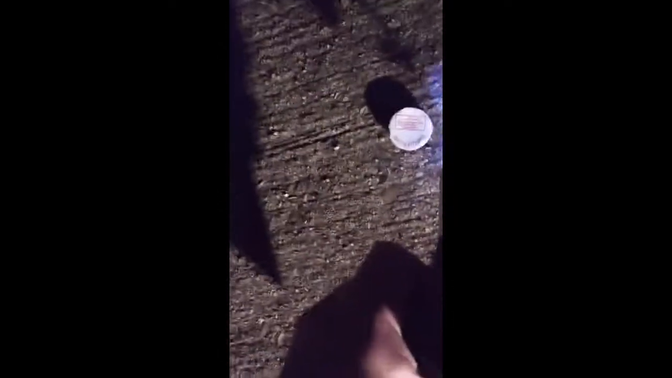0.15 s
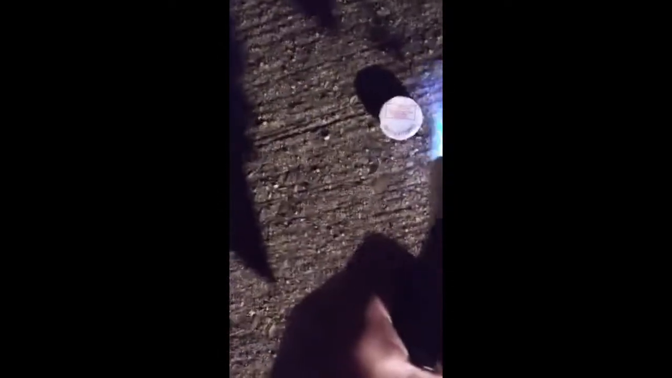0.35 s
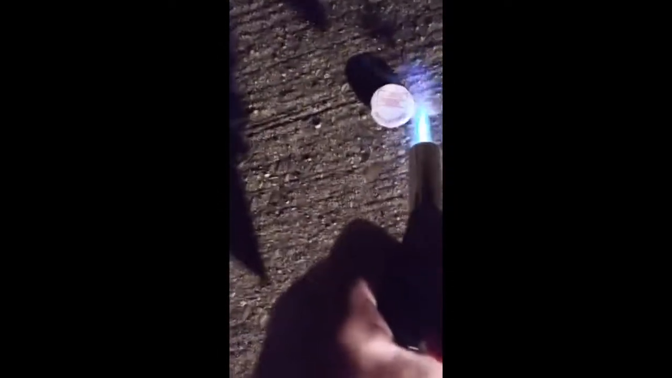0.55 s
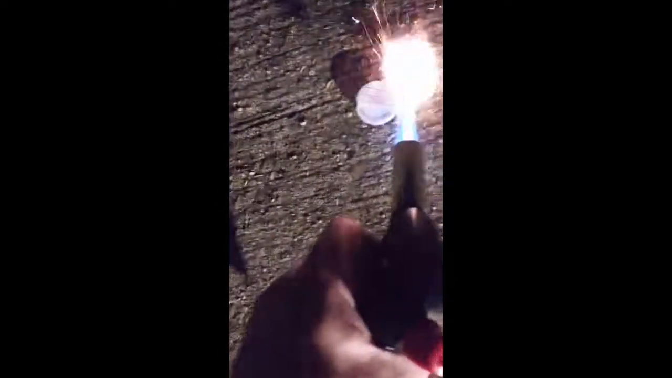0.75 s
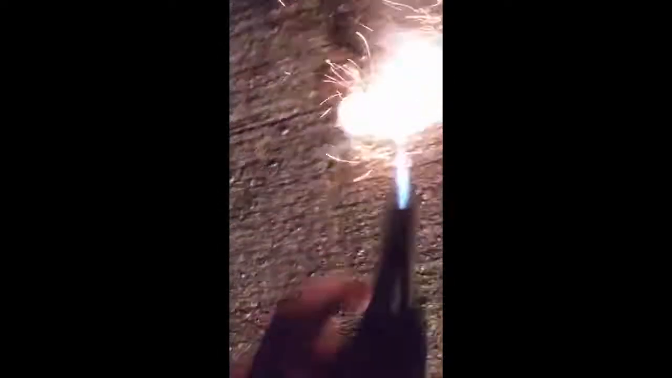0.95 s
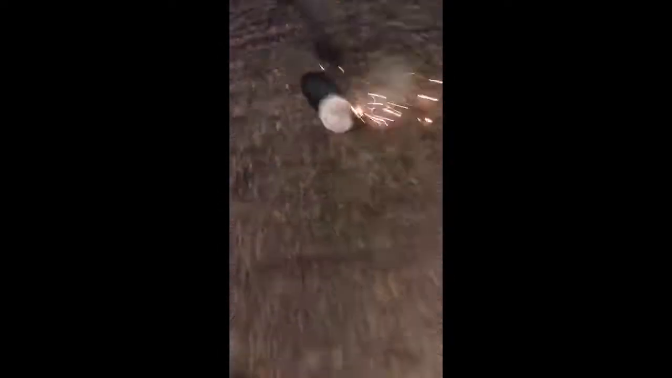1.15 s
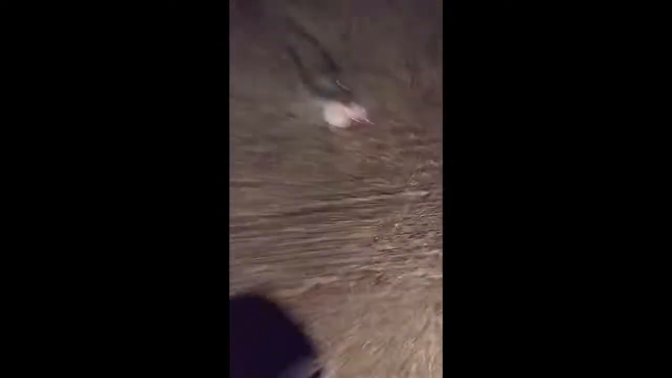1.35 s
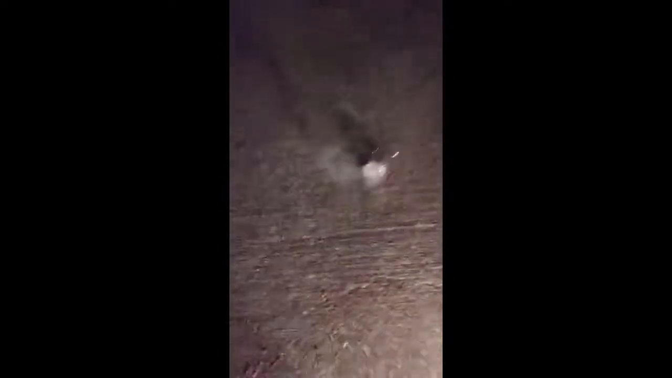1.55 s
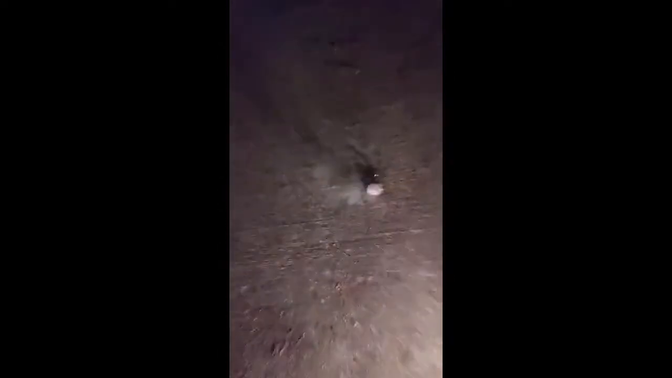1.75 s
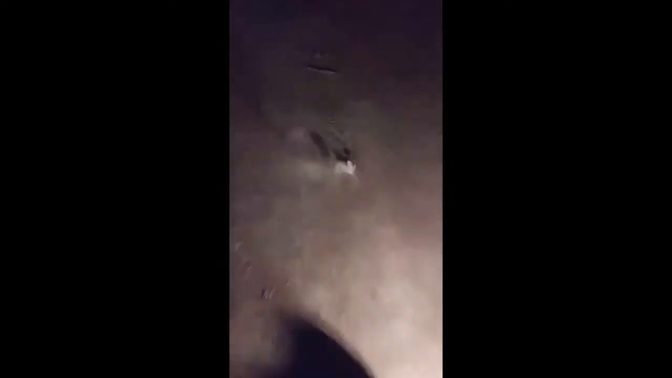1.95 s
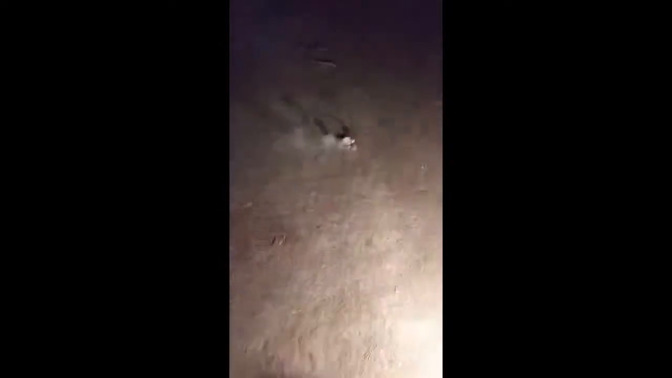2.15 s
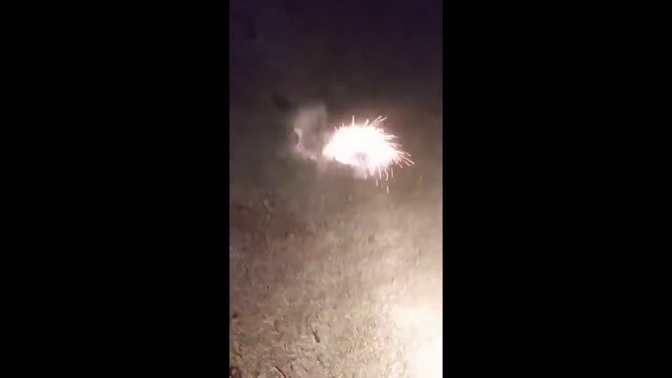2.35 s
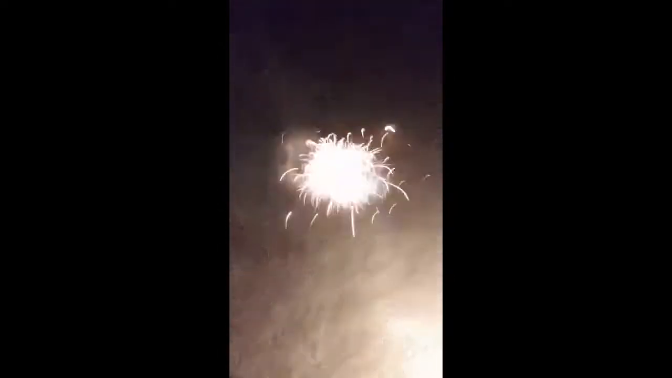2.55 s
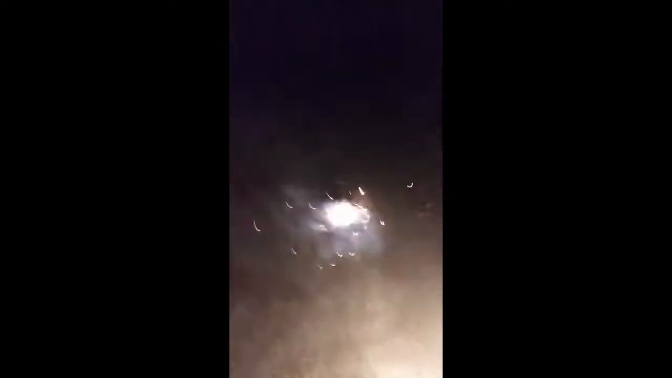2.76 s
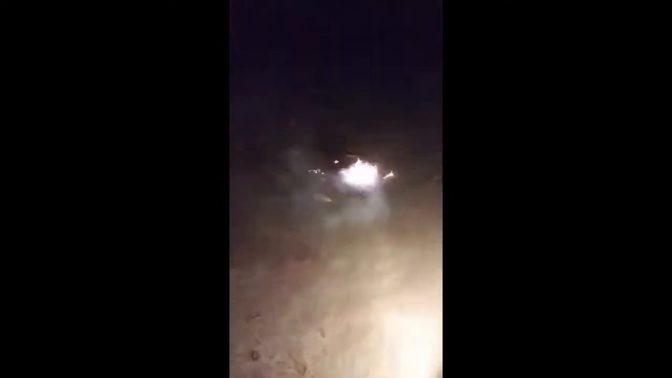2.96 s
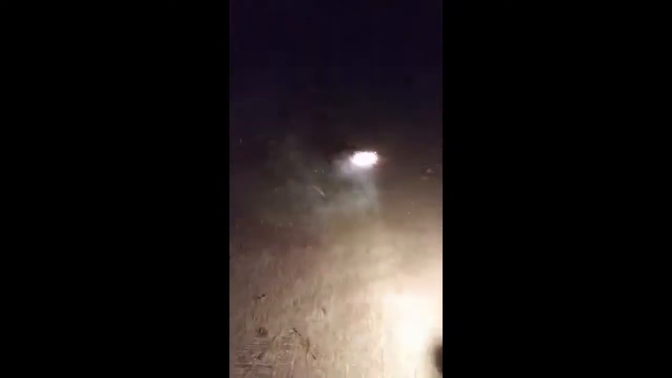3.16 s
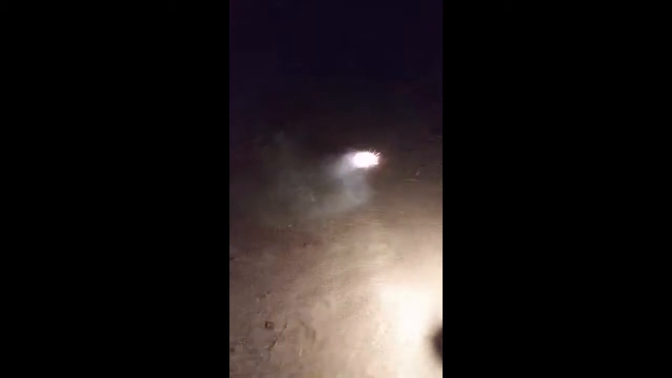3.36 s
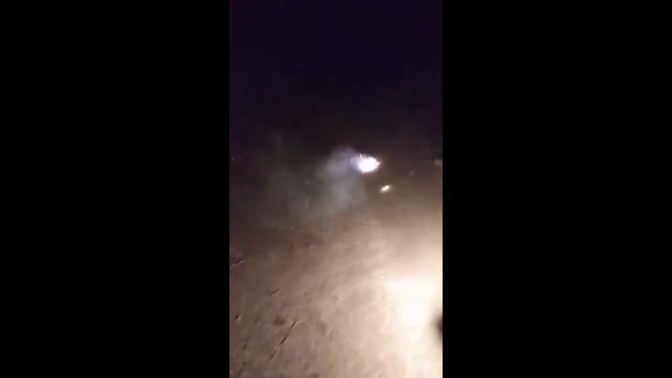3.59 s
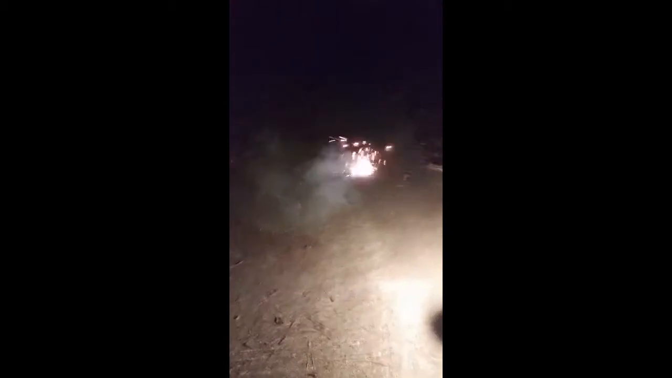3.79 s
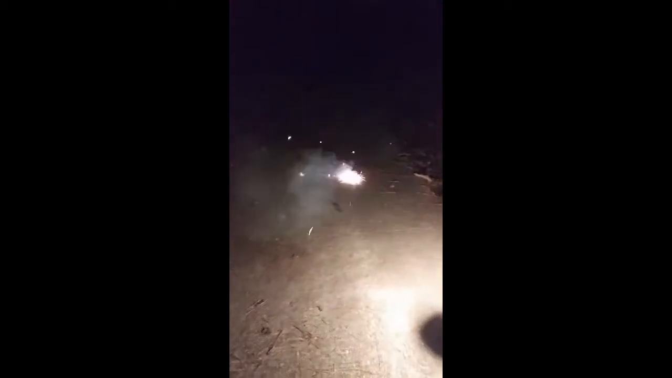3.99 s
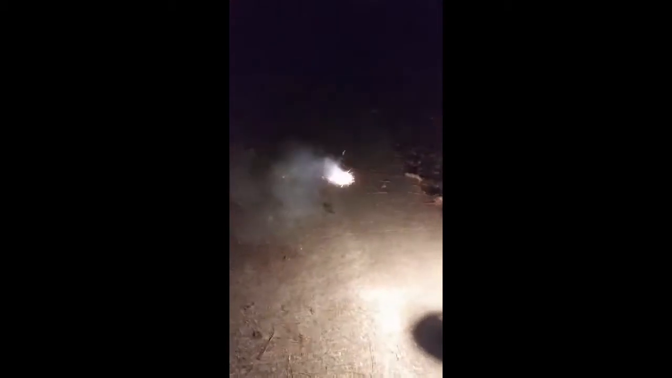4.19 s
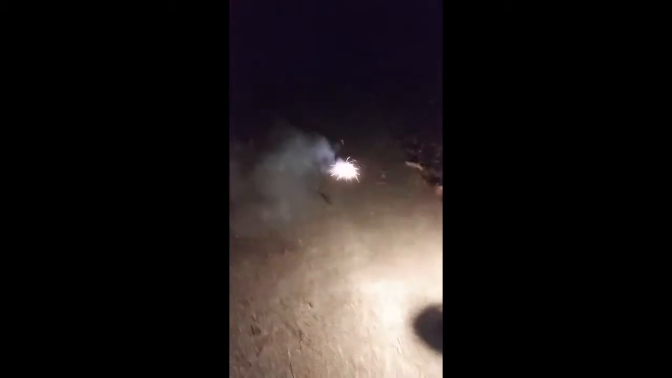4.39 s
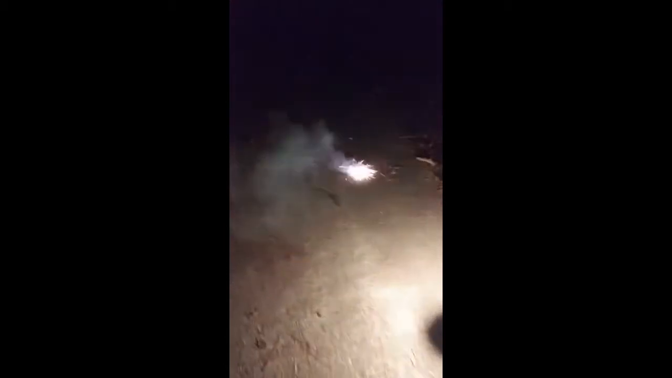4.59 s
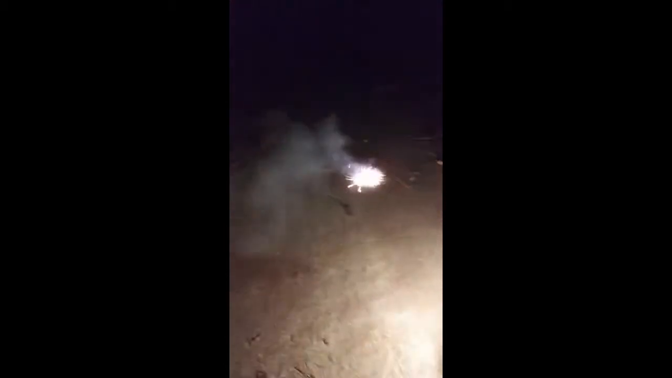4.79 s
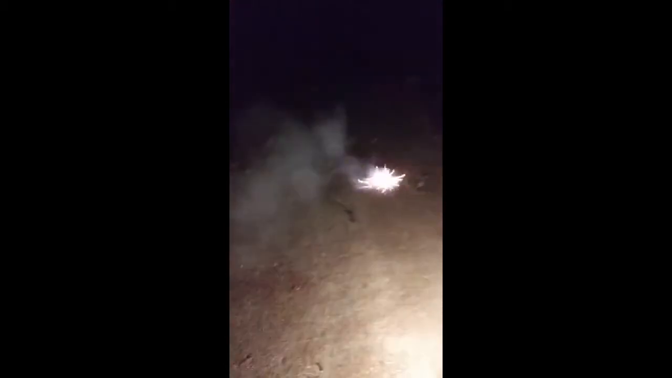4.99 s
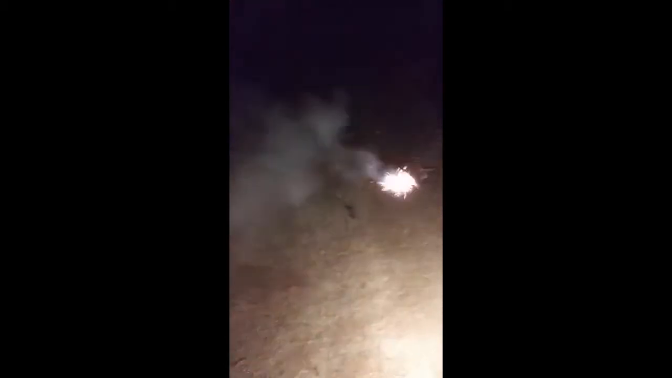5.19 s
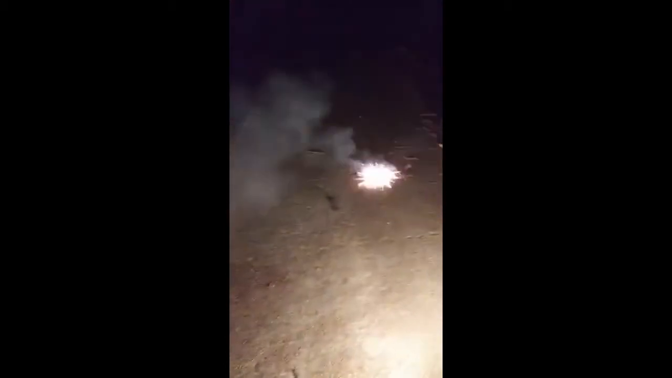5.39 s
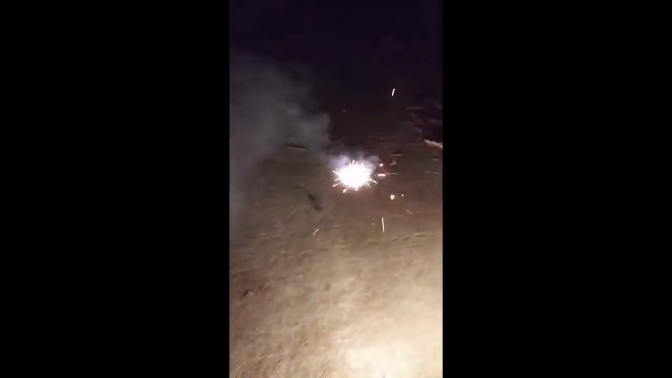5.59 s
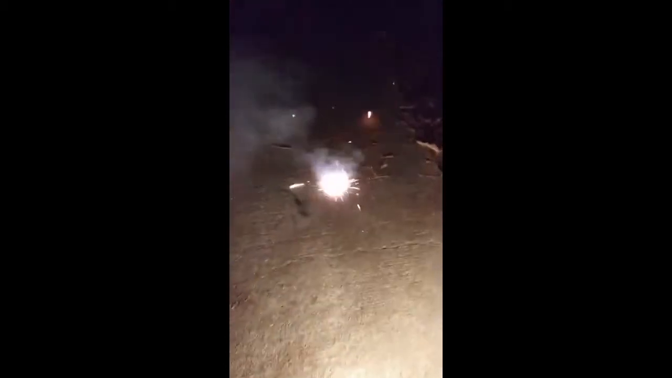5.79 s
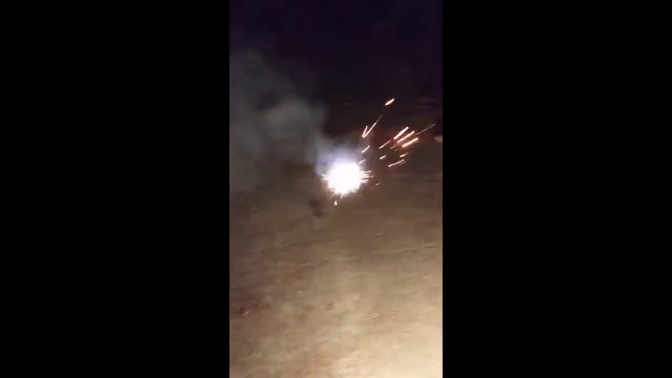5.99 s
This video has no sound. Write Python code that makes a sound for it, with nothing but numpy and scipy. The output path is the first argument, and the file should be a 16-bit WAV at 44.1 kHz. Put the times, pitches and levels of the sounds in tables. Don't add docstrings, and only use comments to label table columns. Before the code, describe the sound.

A fluttering torch flame with a smooth nozzle hiss ends in a hard trigger click. Hurried soles scrape grit, kicking small ticking pebbles, as sparks pop sharply. The fuse gives way to a harsh crackling whoosh that surges twice, then thins to a sputtering jet with dull tube roar, swelling now and then. Open concrete yard, very little echo, handheld microphone moving closer, its hiss tone shifting.

```python
import sys
import numpy as np
from scipy import signal
from scipy.fft import rfft, irfft
from scipy.io import wavfile
from scipy.ndimage import uniform_filter1d, map_coordinates

SR = 44100
rng = np.random.default_rng(int(sys.argv[2]) if len(sys.argv) > 2 else 0)


def boost_factor(decibels):
    exponent = np.asarray(decibels, float) / 20
    return 10 ** exponent


def master_out(mix):
    frames = np.transpose(np.atleast_2d(mix))
    ceiling = np.clip(frames, -1, 1)
    pcm = np.round(ceiling * 32767).astype(np.int16)
    wavfile.write(sys.argv[1], SR, pcm)


N = 266364
IGNITE_S, SPENT_S = 2.33, 0.506


def evened(x):
    return x / np.sqrt(np.mean(x ** 2) + 1e-20)


def read(points, hz):
    f, value = np.transpose(points)
    return np.interp(np.log(hz + 1), np.log(f + 1), value)


def follow(rows):
    s, *columns = np.transpose(rows)
    return [np.interp(np.arange(N) / SR, s, c) for c in columns]


def held(start, length, edge_s):
    t = np.arange(N) / SR
    corners = [start - edge_s, start, start + length, start + length + edge_s]
    return np.interp(t, corners, [0, 1, 1, 0]) ** 2


def add(mix, s, sound):
    part = mix[round(s * SR):][:len(sound)]
    part += sound[:len(part)]


def wander(lo_hz, hi_hz):
    t = np.arange(0, N, 32) / SR
    rates = np.geomspace(lo_hz, hi_hz, num=40)
    slow = sum(np.sin(2 * np.pi * (f * t + rng.random())) / np.sqrt(f) for f in rates)
    return np.interp(np.arange(N) / SR, t, evened(slow))


def coloured(x, points, peaks=()):
    hz = np.fft.rfftfreq(N, 1 / SR)
    db = read(points, hz) + sum(d * np.exp(-((hz - f) / w) ** 2 * 2) for f, w, d in peaks)
    return evened(irfft(rfft(x) * boost_factor(db), N))


def patchy(patch_db):
    a, b, patches = rng.standard_normal((N // 128 + 5, 257, 3)).T
    patches = uniform_filter1d(patches, size=7, axis=0)
    patches = evened(uniform_filter1d(patches, size=20, axis=1))
    spectra = (a + 1j * b) * boost_factor(patch_db * patches)
    return signal.istft(spectra, nperseg=512, noverlap=384)[1][:N]


def bursts(per_s, spread_db):
    strength = boost_factor(spread_db * np.minimum(rng.exponential(1, N), 4))
    return strength * (rng.random(N) < per_s / SR) * rng.choice([-1, 1], N)


def ring(hz, t60_ms, snap):
    t = np.arange(1500) / SR
    crack = signal.lfilter(*signal.butter(2, min(2.5 * hz, 12000), fs=SR), rng.standard_normal(len(t)))
    tone = boost_factor(-60000 * t / t60_ms) * np.sin(2 * np.pi * hz * t)
    sound = tone + snap * boost_factor(-60 * t / 0.0012) * evened(crack)
    return sound / abs(sound).max()


def echoed(x, path_ms, strength, dull_hz):
    dull = signal.filtfilt(*signal.butter(1, dull_hz, fs=SR), x)
    late = map_coordinates(dull, [np.arange(N) - path_ms * SR / 1000])
    return (x + strength * late) / np.sqrt(1 + strength ** 2)


# frequency in Hz, level in dB per Hz.
NIGHT = [(20, -50), (40, -89), (73, -12.5), (187, -3), (310, -2.5), (900, -0.5), (1500, -15), (2200, -22),
         (5700, -22), (7600, -14), (10000, -36), (12500, -38), (15600, -45)]


def night():
    level_db = -43.5 - 1.5 + 0.6 * wander(0.45, 13)
    return boost_factor(level_db) * coloured(patchy(0.4), NIGHT)


def yard(x):
    t = np.arange(9000) / SR
    tail = rng.standard_normal(len(t)) * boost_factor(-60 * t / 0.084) * (t > .004)
    return signal.fftconvolve(x, tail / np.linalg.norm(tail))[:N]


# start in seconds, length in seconds, level in dB.
SIGH = (1.06, .05, -46.5)
# frequency in Hz, level in dB per Hz.
PIPE = [(1200, -29), (2000, -1), (2600, 3), (3200, -10), (4200, -18), (5200, -10), (6500, -31)]


def sigh():
    start, length, db = SIGH
    return boost_factor(db) * held(start, length, 0.023) * coloured(rng.standard_normal(N), PIPE)


# frequency in Hz, level in dB per Hz.
TORCH = [(24, -76), (40, -66), (170, -4.5), (881, -1.5), (1080, -8.5), (1730, -18.5), (3470, -22.5),
         (3930, -34), (5170, -15), (7340, -23.5), (8730, -22.5), (10100, -37.5), (15500, -55)]
# frequency in Hz, width in Hz, gain in dB.
NOZZLE = [(2660, 370, 4), (3440, 380, 1.5), (3900, 600, 2.5), (4600, 180, -7), (5300, 1000, 4.5),
          (6400, 340, -7), (6640, 200, 11.5), (7980, 270, 8.5), (8700, 530, 6)]


def torch():
    t = np.arange(N) / SR
    shut = np.maximum(t - 1.04, 0)
    opening_db = -0.5 * np.maximum(1 - t / 0.39, 0)
    closing_db = -4.5 * np.minimum(shut / .02, 1) - 136 * shut
    gas = coloured(patchy(1.0), TORCH, NOZZLE)
    roar = signal.sosfiltfilt(signal.butter(2, 1700, fs=SR, output="sos"), gas)
    nozzle_hiss = (gas - roar) * boost_factor(0.5)
    flame = roar * boost_factor(0.72 * wander(15, 130)) + nozzle_hiss
    return flame * boost_factor(-33 + opening_db + closing_db)


# start in seconds, length in seconds, level in dB.
SCUFF = [
    (1.098, 0.035, -52),
    (1.218, 0.19, -48),
    (1.402, .09, -54.5),
    (1.504, 0.015, -38),
    (1.532, 0.044, -49),
    (1.584, 0.029, -41.5),
]
# frequency in Hz, level in dB per Hz.
GRIT = [(300, -39), (900, -3), (2000, 3), (3200, -2.5), (4500, 5), (6000, -7), (7600, 6.5), (10000, -18),
        (15600, -26)]


def scuffs():
    stones = bursts(700, 2.1)
    drag = sum(boost_factor(db) * held(s, length, .015) for s, length, db in SCUFF)
    return drag * coloured(stones, GRIT)


# start in seconds, peak in dB, ring in Hz, t60 in ms.
KNOCKS = [(1.252, -46, 703, 14), (1.285, -22.5, 1470, 12), (1.518, -37, 1260, 21), (1.582, -26.5, 790, 26),
          (1.594, -23, 900, 26), (1.607, -24, 960, 31), (1.938, -48, 915, 14), (2.075, -32, 860, 12),
          (2.315, -52, 937, 14), (3.842, -29, 810, 16), (3.859, -18, 1690, 9.6), (3.867, -23, 1620, 14)]


def knocks():
    out = np.zeros(N)
    for s, db, hz, t60_ms in KNOCKS:
        add(out, s, boost_factor(db) * ring(hz, t60_ms, 0.3))
    return out


# start in seconds, peak in dB, ring in Hz.
PEBBLES = [(1.2527, -20.5, 1550), (1.2517, -23, 4000), (1.281, -25, 1480), (1.519, -24.5, 2130),
           (1.527, -29, 4130), (1.5511, -26, 1670), (1.6009, -18, 1550), (1.6053, -19, 1560),
           (1.9383, -28, 1620), (2.1188, -30.5, 1710), (2.316, -24.5, 2220), (3.3364, -31, 1950),
           (3.8435, -23, 3900), (3.8586, -22, 4200), (3.868, -22, 4000), (4.445, -22, 2660)]


def pebbles():
    out = np.zeros(N)
    for s, db, hz in PEBBLES:
        add(out, s, boost_factor(db) * ring(hz, t60_ms=2.3, snap=0.83))
    return out


# start in seconds, peak in dB, centre in Hz, rattle in ms, t60 in ms.
TRIGGER = [
    (1.0119, -15.5, 8800, 1.5, 6.5),
    (1.017, -2, 5300, 1.1, 11),
    (1.049, -9, 4600, 3.2, 14),
]


def trigger():
    out, t_ms = np.zeros(N), np.arange(1500) * 1000 / SR
    for s, db, hz, rattle_ms, t60_ms in TRIGGER:
        decay = boost_factor(-60 * np.maximum(t_ms - rattle_ms, 0) / t60_ms)
        rattle = rng.standard_normal(len(t_ms)) * decay
        band = signal.butter(2, [hz * 0.63, min(hz * 1.51, 15000)], "band", fs=SR)
        snap = signal.lfilter(*band, rattle) + 0.47 * rattle
        add(out, s, boost_factor(db) * snap / abs(snap).max())
    return out


# start in seconds, peak in dB.
SPARKS = [(1.1643, -35), (1.1945, -26), (1.3124, -21), (1.3374, -25), (1.3798, -37), (1.4207, -23),
          (1.4775, -31), (1.504, -28), (1.5344, -27), (1.547, -36), (1.5874, -35), (1.5953, -25),
          (1.6367, -29), (1.9773, -24), (2.0326, -20), (2.099, -34), (2.162, -34), (2.1684, -30),
          (2.9564, -34), (4.2512, -30)]


def sparks():
    out = np.zeros(N)
    for s, db in SPARKS:
        add(out, s, boost_factor(db) * ring(7760, t60_ms=3.9, snap=0.8))
    return out


def small_hits():
    hits = trigger() + sparks() + pebbles() + knocks()
    return signal.lfilter(*signal.butter(3, [250, 9000], "band", fs=SR), hits)


WHISTLE = 2.96, .15, 1085, 1205, -41


def whistle():
    start, length, from_hz, to_hz, db = WHISTLE
    hz = np.interp(np.arange(N) / SR, [start, start + length], [from_hz, to_hz])
    r = np.exp(-np.pi * 50 / SR)
    slow = signal.lfilter([1 - r], [1, -r], rng.standard_normal(N) + 1j * rng.standard_normal(N))
    steadied = slow / np.sqrt(abs(slow))
    tone = evened((steadied * np.exp(2j * np.pi * np.cumsum(hz) / SR)).real)
    return boost_factor(db) * held(start, length, 0.009) * tone


# time in seconds, level in dB.
FUSE = [(1.07, -55), (1.476, -51.5), (1.65, -56.5), (1.984, -57), (2.32, -59)]
# time in seconds, level in dB.
FLARES = [
    [(2.33, -48), (2.356, -27.5), (2.434, -16), (2.486, -24), (2.518, -17.5), (2.572, -22.5)],
    [(2.6, -15), (2.67, -12), (2.72, -17), (2.77, -15.5), (2.82, -26), (2.846, -29), (2.94, -34.5),
     (3.0, -44)],
]
# time in seconds, level in dB.
JET = [(3.11, -49.5), (3.28, -51.5), (3.44, -48), (3.576, -36.5), (3.72, -49.5), (3.81, -53.5),
       (3.9, -48.5), (4.16, -38.5), (4.36, -44.5), (4.6, -44.5), (4.9, -40.5), (5.08, -50.5), (5.17, -43.5),
       (5.36, -43.5), (5.42, -46), (5.82, -36.5), (5.97, -41), (6.04, -34.5)]


def burn_level():
    return follow(FUSE + sum(FLARES, []) + JET)[0]


# frequency in Hz, level in dB per Hz.
HISS = [(60, -60), (100, -40), (260, -21), (1000, -12), (2400, -13), (3300, -10), (4600, -7.5), (7300, -2),
        (9400, -8.5), (11500, -31.5), (15600, -49)]
# frequency in Hz, width in Hz, gain in dB.
BODY = [(5960, 500, -5), (7950, 420, 3), (1090, 140, -22)]


def gas_hiss(noise):
    return coloured(noise, HISS, BODY)


def jet(gas, since):
    hiss = gas_hiss(gas)
    low = signal.filtfilt(*signal.butter(2, 5150, fs=SR), hiss)
    thin_s = 0.41
    cooling = held(IGNITE_S + SPENT_S + 0.026, thin_s, .04)
    settled = np.clip((since - SPENT_S - thin_s) / .15, 0, 1)
    return hiss + (0.57 * settled - 0.67 * cooling) * low


# frequency in Hz, level in dB per Hz.
FIZZ = [(6500, -54), (9000, 0), (10500, 8.5), (12000, -2), (13200, -7), (14500, -7), (15700, -11)]


def top_fizz(gas, hiss_db, since):
    cool_s, cold_db = 0.32, -64
    glow_s = [-.22, 0, SPENT_S, SPENT_S + cool_s]
    glow_db = np.interp(since, glow_s, [-75, -55, -46, cold_db])
    stirred_db = 0.12 * (since > SPENT_S + cool_s) * (hiss_db + 43)
    ember = boost_factor(glow_db + stirred_db - hiss_db)
    flare = boost_factor(-11.5 - 21.5 * np.clip(since, 0, SPENT_S))
    return np.hypot(flare, ember) * coloured(gas, FIZZ)


# start in seconds, length in seconds, level in dB.
SPITS = [(1.502, 0.015, -39), (1.59, 0.022, -58), (1.98, 0.02, -43), (2.019, 0.01, -48),
         (2.175, 0.019, -41.5), (3.293, 0.056, -40.5), (3.461, 0.024, -39), (3.82, 0.067, -42),
         (3.924, 0.058, -40.5), (4.249, 0.043, -40.5)]


def spits():
    puffs = np.zeros(N)
    for s, length, db in SPITS:
        add(puffs, s, boost_factor(db) * signal.windows.tukey(round(length * SR), .3))
    return puffs * gas_hiss(rng.standard_normal(N)) * boost_factor(1.0 * wander(80, 440))


# start in seconds, length in seconds, gain in dB.
GASPS = [
    (2.37, 0.054, -8),
    (2.835, 0.17, -5.5),
    (2.996, 0.089, 1),
    (4.652, 0.24, 2.5),
    (5.217, .15, 3),
    (5.403, 0.053, -4),
    (5.608, 0.19, 2),
]
# frequency in Hz, level in dB per Hz.
ROAR = [(60, -55), (100, -38), (290, -11), (1000, -4), (2200, -8), (6000, -23.5), (8000, -74)]
# frequency in Hz, width in Hz, gain in dB.
TUBE = [(885, 110, 1)]


def tube_roar(hiss_db, since, sputter_db):
    r = np.exp(-1 / (0.014 * SR))
    lagged_db = signal.lfilter([1 - r], [1, -r], hiss_db + 42.5)
    unlit_db = -40 * np.clip(-since / 0.033, 0, 1)
    gasp_db = sum(db * held(s, length, 0.0069) for s, length, db in GASPS)
    roar_db = -39 + 0.42 * lagged_db + unlit_db + gasp_db
    return coloured(patchy(1.8), ROAR, TUBE) * boost_factor(roar_db - 0.5 + 0.86 * sputter_db)


# time in seconds, extra path in ms.
GROUND = [(2.35, .67), (2.8, .82), (2.95, 1.02), (3.3, 1.0), (3.7, 1.085), (4.3, 1.165), (4.7, 1.1),
          (5.2, .915), (5.4, .88), (5.48, .81), (5.68, .77), (5.85, .62), (6.04, .55)]
# time in seconds, strength from 0 to 1.
MIRROR = [(3.3, .4), (4, .7), (5.35, .72), (5.6, .55)]


def ground_bounce(x):
    flicker = np.clip(1 + .13 * wander(2.5, 15), 0, 1.25)
    return echoed(x, *follow(GROUND), flicker * follow(MIRROR)[0], dull_hz=7200)


OPENS_S = [2.5, 2.62]


def hand_bounce(x):
    strength = np.interp(np.arange(N) / SR, OPENS_S, [.66, .15])
    return echoed(x, .428, strength, dull_hz=6000)


def firework():
    t = np.arange(N) / SR
    since = t - IGNITE_S
    hiss_db = burn_level()
    sputter_db = wander(22, 220) * np.interp(hiss_db, [-30, -18], [1, .55])
    grains = bursts(1500, 2.8)
    gas = evened(patchy(1.7)) + .3 * evened(grains)
    hiss = jet(gas, since) + top_fizz(gas, hiss_db, since)
    hiss = hiss * boost_factor(hiss_db + 1.64 * sputter_db) + spits()
    lit = np.interp(t, [1.05, 1.07], [0, 1])
    burning = lit * (hiss + tube_roar(hiss_db, since, sputter_db))
    return hand_bounce(ground_bounce(burning)) + whistle()


def scene():
    near = firework() + small_hits() + scuffs()
    return (near + boost_factor(-22.5) * yard(near) + torch() + night() + sigh())[None]


def top_cut(x):
    return signal.sosfilt(signal.butter(12, 15750, fs=SR, output="sos"), x)


def record(dry):
    soft = .72 * np.tanh(dry / .72)
    return top_cut(soft)


dry = scene()
out = record(dry)
master_out(out)
```